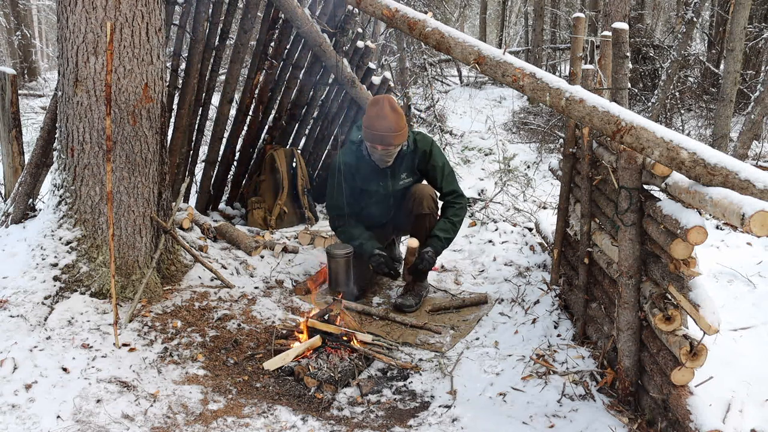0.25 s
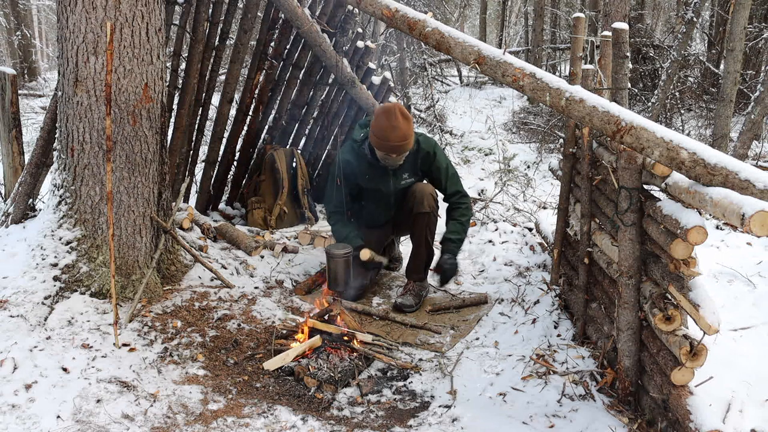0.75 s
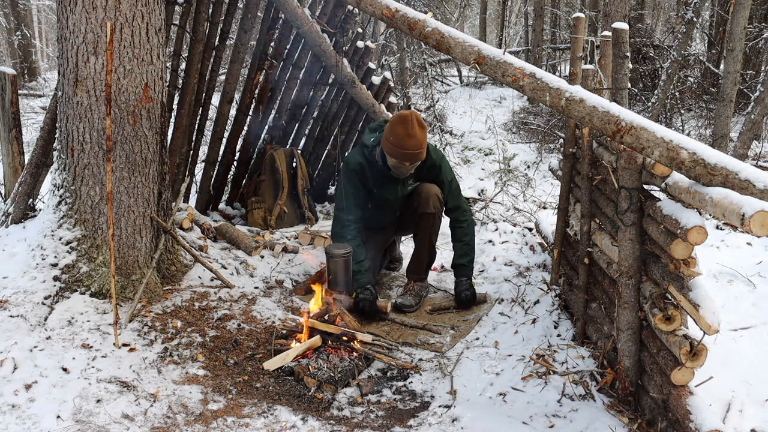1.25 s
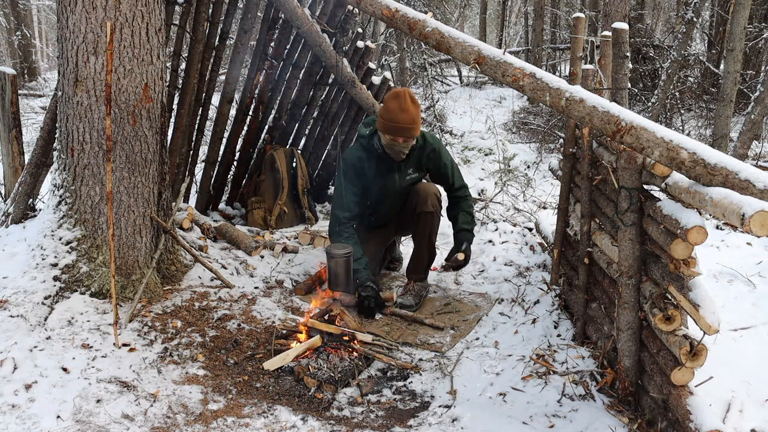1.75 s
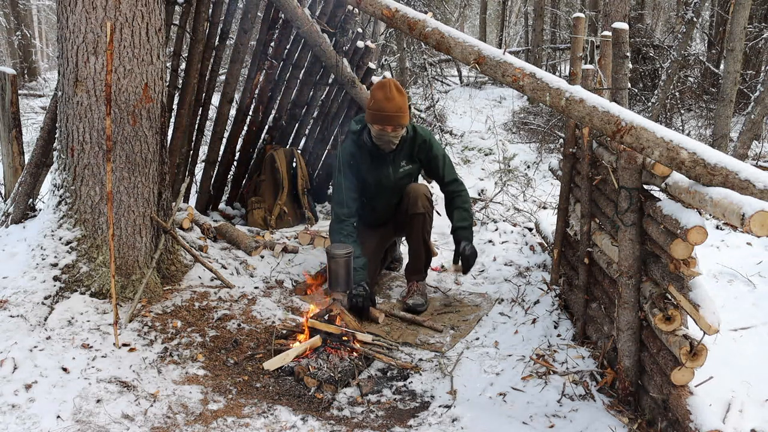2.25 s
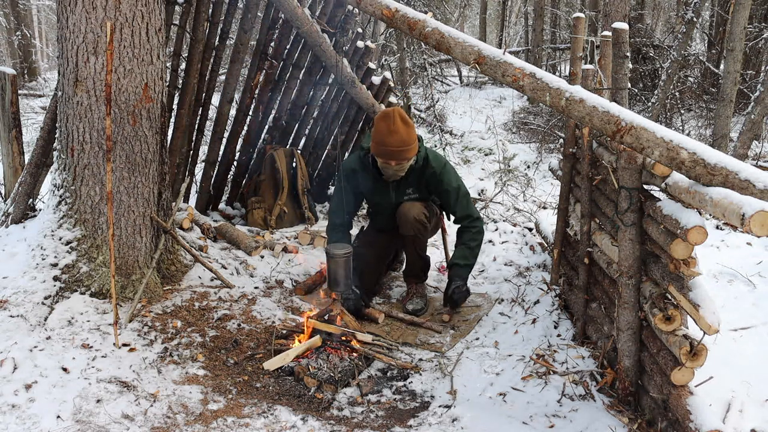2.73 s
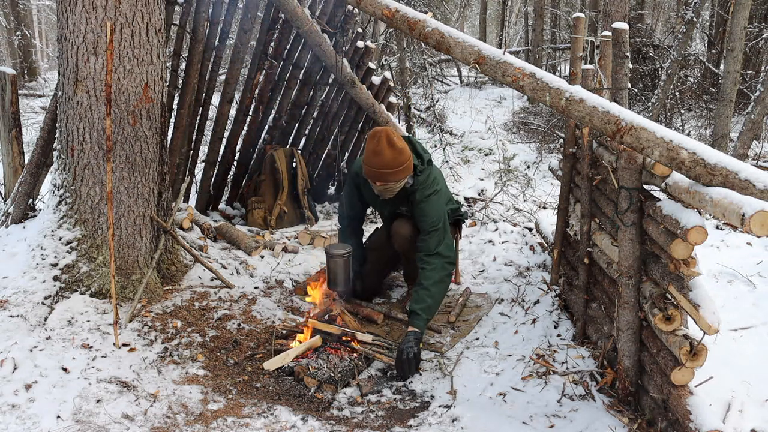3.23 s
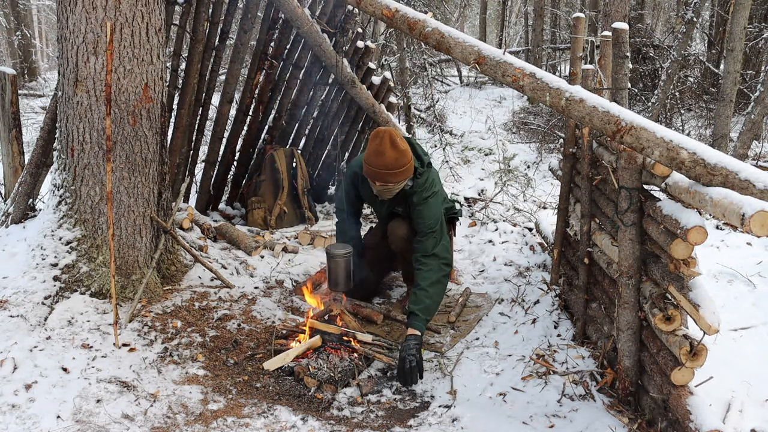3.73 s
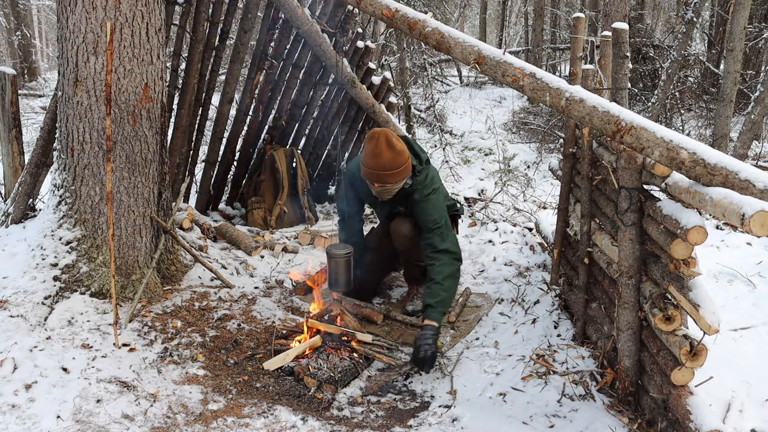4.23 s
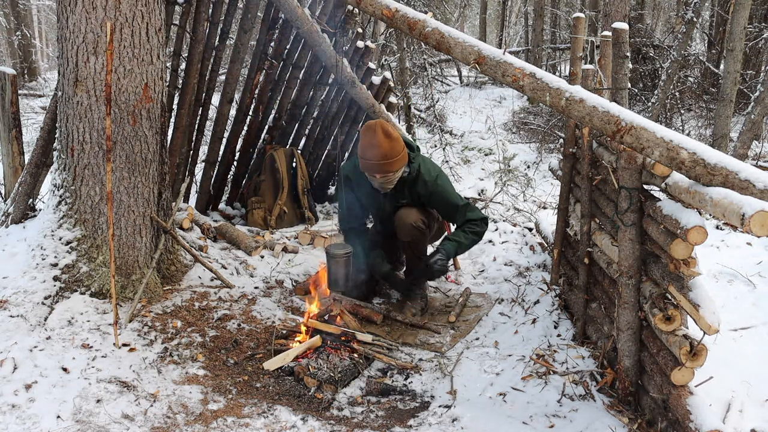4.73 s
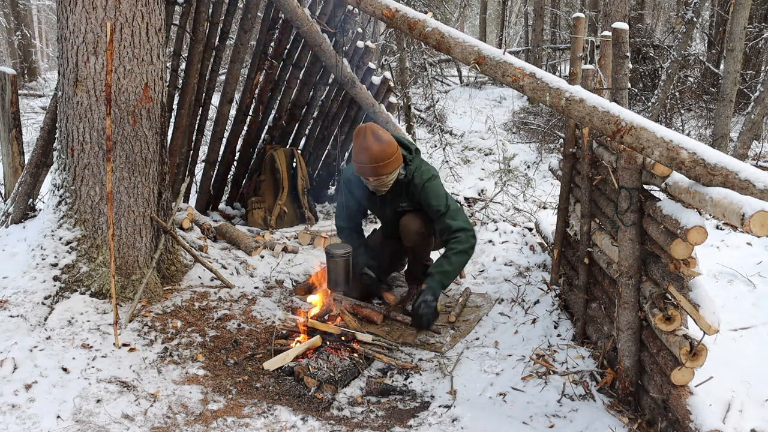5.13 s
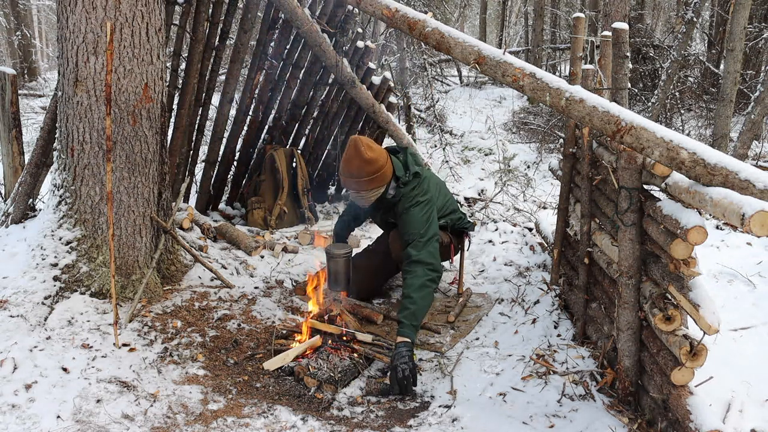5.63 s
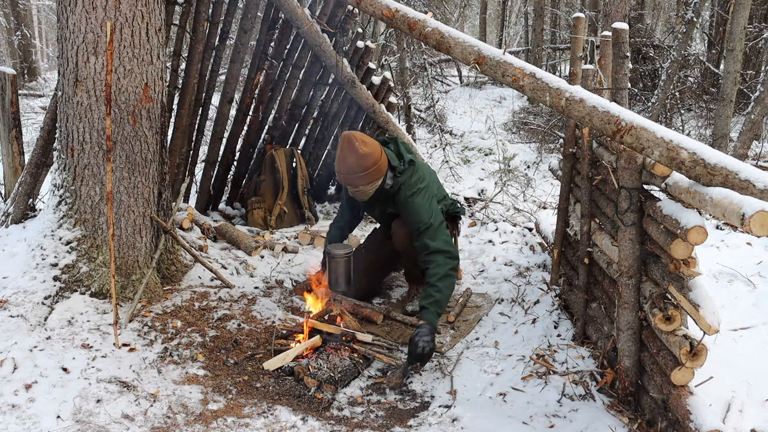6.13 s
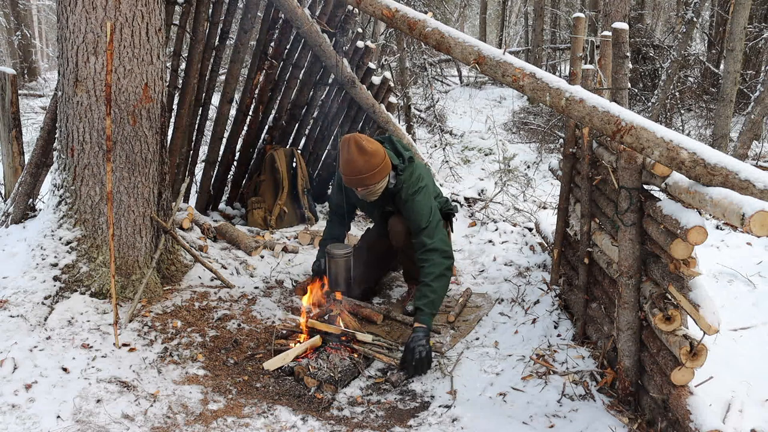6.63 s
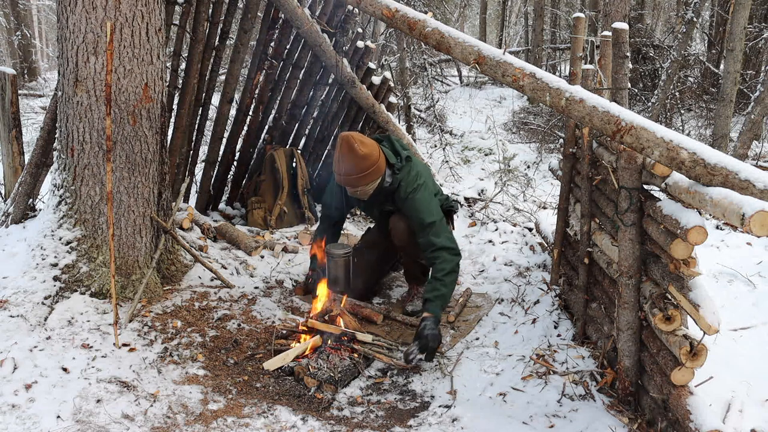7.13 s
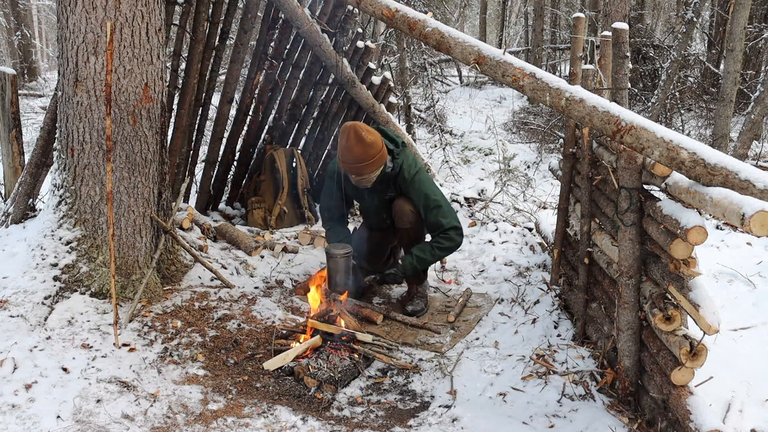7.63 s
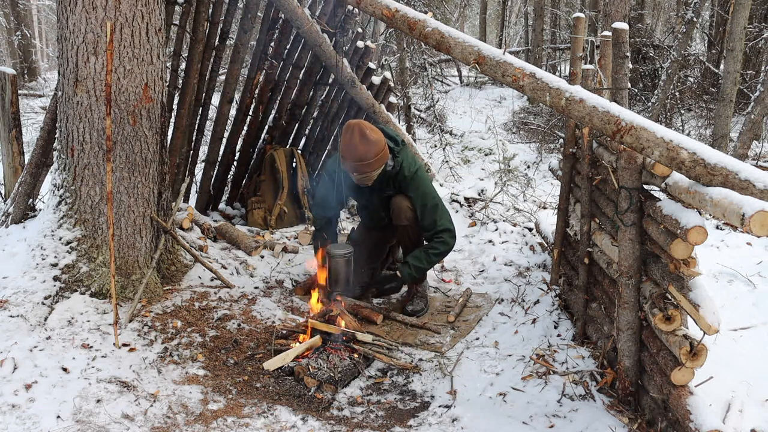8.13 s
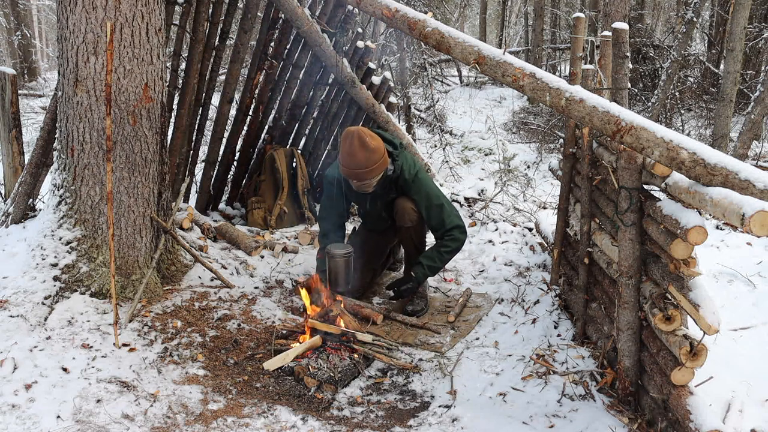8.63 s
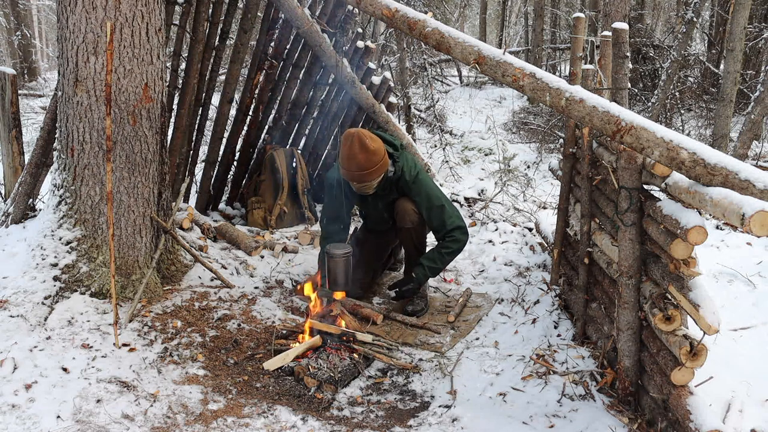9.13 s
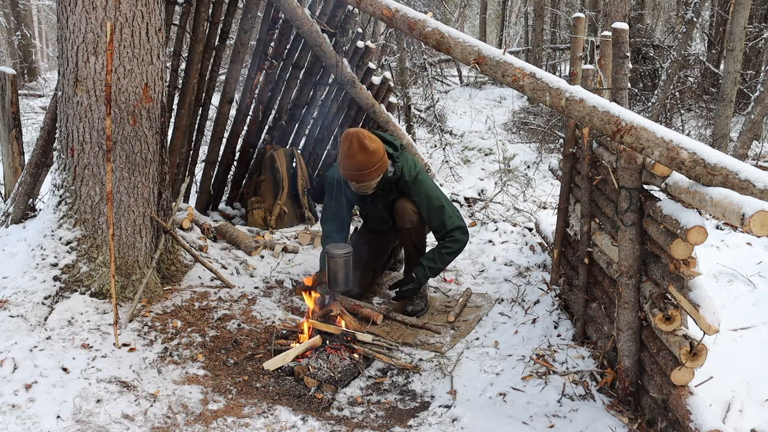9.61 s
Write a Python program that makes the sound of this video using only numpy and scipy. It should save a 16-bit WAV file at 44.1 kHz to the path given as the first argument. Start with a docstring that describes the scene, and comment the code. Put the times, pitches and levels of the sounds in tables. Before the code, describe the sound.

A small campfire is heard close up outdoors in a cold, quiet forest. A burst of rustle and hiss opens the scene, with a cluster of sharp pops at 0.1-0.5 s, two of them loud. Sticks knock softly between 1 and 3 s, with one bright clack near 1.6 s beside two loud snaps. Rustling of clothes and litter swells around 3 s, fades, then returns near 5, 6.4 and 7.2 s. Strong cracks stand out at 4.0, 4.2, 4.45, 4.7 and 6.35 s, then a dense run from 7 to 7.5 s ends in the loudest, clipped pair. More snaps follow at 8.0 and 8.5 s; afterwards the crackle thins, with one loud pop near 9.35 s. Throughout, tiny ticks, thin fizzing and faint low flame flutter continue, each pop leaving a short, scattered woody echo.

```python
"""Sharp pops are heard first: a small campfire crackles in a snowy forest as pockets of sap burst.
Each pop is a pressure impulse with splintering noise and decaying echoes from a log wall and trunks.
Behind them small pockets tick, and someone crouched beside the fire knocks sticks (decaying sines) and
rustles (filtered noise and short grains). Wet wood hisses and low flames flutter, both shaped noise.
The loudest pops overload and clip."""
import sys
import numpy as np
from scipy import signal
from scipy.fft import rfft, irfft, next_fast_len
from scipy.io import wavfile
from scipy.ndimage import uniform_filter1d, map_coordinates

SR = 44100
rng = np.random.default_rng(int(sys.argv[2]) if len(sys.argv) > 2 else 0)


def output_pcm(signal):
    """Save a mono or channel-first signal as 16-bit PCM at the path in sys.argv[1].

    Samples are clipped to [-1, 1] before scaling.
    """
    pcm = np.clip(np.atleast_2d(signal).T, -1, 1) * 32767
    wavfile.write(sys.argv[1], SR, np.round(pcm).astype(np.int16))


N = 435255


def amp(db):
    """Level in decibels to amplitude ratio."""
    return 10 ** (np.asarray(db) / 20)


def unit(x):
    """Normalization to a root-mean-square of 1."""
    return x / np.sqrt(np.mean(x ** 2) + 1e-20)


def along(points, hz):
    """Interpolation of (frequency, value) points on a logarithmic frequency axis."""
    point_hz, values = np.transpose(points)
    return np.interp(np.log(hz + 1), np.log(point_hz + 1), values)


def curves(rows):
    """Linear envelopes: one value per sample for each column after the time."""
    s, *columns = np.transpose(rows)
    return [np.interp(np.arange(N) / SR, s, column) for column in columns]


def wobble(rate):
    """Band-limited random modulation: a smooth curve through `rate` random knots a second."""
    knots = rng.standard_normal(N // 200 + 8)
    return map_coordinates(knots, [np.arange(N) * rate / SR])


def causal(x, spectrum):
    """Minimum-phase filtering by the folded cepstrum; the impulse response peaks at 1."""
    size = 2048
    level_db = along(spectrum, np.fft.rfftfreq(size, 1 / SR))
    cepstrum = irfft(np.log(amp(level_db)), size)
    cepstrum[1:size // 2] *= 2
    cepstrum[size // 2 + 1:] = 0
    response = irfft(np.exp(rfft(cepstrum)), size)[:size // 2]
    return signal.fftconvolve(x, response[None] / np.abs(response).max(), axes=1)[:, :N]


def place(times, rows):
    """Superposition of stereo rows (2, events, length) at their times in samples."""
    starts = np.round(times * SR).astype(int)
    where = (starts[:, None] + np.arange(rows.shape[-1])).ravel()
    return np.array([np.bincount(where, r.ravel(), N + SR)[:N] for r in rows])


# Likeness of the two channels of diffuse noise: (frequency [Hz], correlation [0..1])
CHANNEL_LIKENESS = [(50, 1), (1000, 0.86), (4000, 0.42), (12000, 0.043)]


def rush(spectrum, patchy_db):
    """Diffuse-field noise of rms 1: partly correlated channels, with time-frequency patches of gain."""
    hz, _, z = signal.stft(rng.standard_normal((2, N)), SR, nperseg=512)
    field = uniform_filter1d(rng.standard_normal(z.shape[1:]), size=8, axis=0)
    field = uniform_filter1d(field, size=6, axis=1)
    patches = amp(patchy_db * unit(field))
    # mid and side shares that give left and right the wanted correlation
    turn = np.arccos(np.clip(along(CHANNEL_LIKENESS, hz), -1, 1)) / 2
    shares = np.array([np.cos(turn), np.sin(turn)])[..., None]
    pair = signal.istft(z * patches * shares, nperseg=512)[1]
    m = next_fast_len(N)
    gain = amp(along(spectrum, np.fft.rfftfreq(m, 1 / SR)))
    mid, side = irfft(rfft(pair[:, :N], m) * gain, m)[:, :N]
    return unit(np.array([mid + side, mid - side]))


# Noise spectrum of the flames: (frequency [Hz], relative level [dB per Hz])
FLAME_SPECTRUM = [(15, -45), (25, -19.5), (109, 5.5), (201, -5.5), (301, -4), (509, -13), (900, -15.5),
                  (1170, -67), (1980, -120)]
FLUTTER_DB, FLUTTER_SWING_DB = -56, 3  # mean level, scale of its random swing


def flames():
    """Amplitude modulation of low-frequency noise: the flames flutter."""
    level_db = FLUTTER_DB + FLUTTER_SWING_DB * wobble(12)
    return amp(level_db) * rush(FLAME_SPECTRUM, patchy_db=.6)


# Slow levels of the background: (time [s], rustle level before trim [dB], hiss level [dB])
BED_LEVELS = [(0.0, -41, -41), (0.16, -52.5, -54), (0.79, -51, -60.5), (1.32, -47, -48), (2.61, -46, -51.5),
              (2.97, -39.5, -51.5), (3.68, -59, -63), (4.2, -54, -52.5), (4.9, -42.5, -53),
              (5.9, -52, -54.5), (6.4, -45.5, -50), (6.9, -55.5, -55), (7.25, -42.5, -47),
              (7.45, -51.5, -49.5), (7.59, -51.5, -56.5), (8.4, -56, -59.5), (9.23, -62.5, -61),
              (9.87, -58, -64)]
# Noise spectrum of the hiss: (frequency [Hz], relative level [dB per Hz])
HISS_SPECTRUM = [(1760, -59), (3000, 4.5), (5630, 3.5), (10700, 3.5), (12500, 5), (15100, -10),
                 (16200, -32)]
FIZZ_DB = 4  # scale of the quick unevenness


def wet_wood():
    """Rapid amplitude modulation of high-frequency noise: wet wood fizzes."""
    hiss_db = curves(BED_LEVELS)[1]
    return amp(hiss_db) * amp(FIZZ_DB * wobble(200)) * rush(HISS_SPECTRUM, patchy_db=1.5)


def crumbs(rustle_db):
    """Granular damped oscillation: dry litter and cloth give way in grains of a few cycles."""
    s, size, pitch, side = rng.random((2200, 4)).T[..., None]  # s: fraction of the scene
    t = np.arange(400) / SR
    hz = 550 * 6 ** pitch
    level_db = rustle_db[(s * N).astype(int)] + np.minimum(6 - 4 * np.log(size), 18)
    decay = amp(level_db - 60 * t * hz / 7)  # 60 dB in seven cycles
    grain = decay * np.sin(2 * np.pi * hz * t) * (1 - np.exp(-t * hz))
    pan = amp(3.8 * (side - 1.0) * np.array([1, -1])[:, None, None])  # leans right
    return place(s[:, 0] * N / SR, grain * pan)


# Noise spectrum of the rustle: (frequency [Hz], relative level [dB per Hz])
RUSTLE_SPECTRUM = [(150, -41), (250, 2), (400, 6), (782, -2.5), (1700, 6), (3490, -0.5), (5640, -13),
                   (7000, -20), (9100, -38), (15400, -120)]


def rustle():
    """Friction noise of clothes and litter: noise under irregular scratching, plus grains."""
    rustle_db = curves(BED_LEVELS)[0]
    scratch = unit(amp(5 * wobble(160) + 1.5 * wobble(30)))
    friction = amp(rustle_db - 2.5) * scratch * rush(RUSTLE_SPECTRUM, patchy_db=3.0)
    return friction + crumbs(rustle_db)


# Sticks knocking on wood and ground, and at 1.568 s a short high squeak: (time [s], level before mode gains
# [dB], lowest mode [Hz])
STICK_KNOCKS = [(1.037, -37.5, 686), (1.123, -35.5, 290), (1.313, -32, 328), (1.493, -37, 346),
                (1.522, -45, 330), (1.559, -41, 440), (1.568, -16, 1930), (2.063, -38, 563),
                (2.077, -39, 496), (2.289, -42, 303), (2.547, -30.5, 407), (2.556, -27.5, 324),
                (2.585, -37, 450), (2.728, -33.5, 562), (2.99, -32, 620), (4.613, -35.5, 667),
                (4.773, -36.5, 640), (7.124, -35, 313), (7.284, -29.5, 326), (8.503, -38, 268),
                (9.736, -42, 157)]


def sticks():
    """Modal vibration: three damped modes of a stick, and a noise thud stronger for low pitches."""
    s, db, hz = np.transpose(STICK_KNOCKS)[..., None]
    t = np.arange(SR // 8) / SR
    # frequency ratio, level [dB], cycles of the lowest mode to decay by 60 dB
    modes = [(1, 10, 12.8), (1.45, 2, 15), (2.2, 0, 16)]
    tones = sum(amp(level - 60 * t * hz / cycles) * np.sin(2 * np.pi * ratio * hz * t)
                for ratio, level, cycles in modes)
    noise = rng.standard_normal((len(s), 3, len(t))).transpose(1, 0, 2)
    band = signal.butter(2, [150, 800], "bandpass", fs=SR, output="sos")
    thud = unit(signal.sosfilt(band, noise[0] + .4 * noise[1:])) * amp(-60 * t / .03)
    onset = 1 - np.exp(-t / .0012)
    return place(s[:, 0], amp(db) * onset * (tones + 120 / hz * thud))


# Small pockets [dB]: level over the hiss, spread of sizes, largest, mean body, mean tail before trim
TICK_DB, TICK_SPREAD_DB, TICK_TOP_DB, TICK_BODY_DB, TICK_TAIL_DB = 18.5, 4.5, 30.5, -8.5, -27


def ticks():
    """Random impulse process: 420 small pockets tick, strongest while the wood hisses."""
    when, size, tone, spread = rng.random((420, 4)).T
    hiss_db = curves(BED_LEVELS)[1][(when * N).astype(int)]
    db = hiss_db + np.minimum(TICK_DB - TICK_SPREAD_DB * np.log(size), TICK_TOP_DB)
    body_db = TICK_BODY_DB + 22 * (tone - .5)
    tail_db = TICK_TAIL_DB + 12 * (spread - .5)
    return pops(when * N / SR, db, body_db, tail_db, length=1024)


def bursts(tail_db, splinter, near_t60, far_t60, far_db, alike, spiky_db, wall_db, length):
    """Impulse and scattering: a spike, brief splintering, then echoes from near logs and far trunks."""
    t = np.arange(length) / SR
    noise = rng.standard_normal((len(tail_db), 3, length)).transpose(1, 0, 2)
    share = np.clip(alike, 0, 1)
    pair = np.sqrt(share) * noise[0] + np.sqrt(1 - share) * noise[1:]
    spike = (t == 0) + splinter * pair * amp(-60 * t / .0014) * (t > 0)
    # single logs stand out of the scatter as separate slaps, different in each channel
    steps = rng.standard_normal((len(tail_db), 2, length // 16))
    slaps = amp(spiky_db * np.repeat(steps, 16, axis=2).transpose(1, 0, 2))
    # the log wall answers about a metre of path later, mostly on the left
    wall = amp(wall_db) * np.exp(-((t - .0033) / 0.00029) ** 2) * np.array([1, .4])[:, None, None]
    near = (amp(-60 * t / near_t60) + wall) * slaps
    far = amp(far_db - 60 * t / far_t60)
    rise = 1 - np.exp(-t / 0.00025)
    return spike + amp(tail_db)[:, None] * pair * (near + far) * rise


# Filter of the bright crack: (frequency [Hz], relative level [dB])
CRACK_SPECTRUM = [(300, -35.5), (2000, -3), (5000, -0.5), (8000, 2), (11500, 4), (14000, -6.5),
                  (17000, -11.5)]
# Filter of the lower body: (frequency [Hz], relative level [dB])
BODY_SPECTRUM = [(25, -29.5), (70, -8.5), (800, -10), (1600, -0.5), (3000, -0.5), (8000, -10), (16000, -36)]
# Pops that stand out: (time [s], treble level before panning [dB], body relative to treble [dB],
# scattered tail before trim [dB])
SAP_POPS = [(0.0864, -19, -14, -29.5), (0.091, -17, -21, -33), (0.1008, -27, -18, -40),
            (0.1198, -15.5, -4, -40), (0.1404, -7.5, -3, -26), (0.164, -18, -4.5, -24),
            (0.1749, -18, -16, -32), (0.1876, -6, -15, -23), (0.2071, -18, -4, -19), (0.2316, 5.5, -9, -25),
            (0.293, -14.5, -7.5, -19), (0.3162, 5.5, -7.5, -27.5), (0.3546, -18, -3.5, -14),
            (0.4932, -6, -12, -17), (0.733, -4, -39, -34), (0.776, -15, -15, -26), (0.7892, -19, -12, -24),
            (0.8049, -23, 2, -20), (0.8329, -25.5, -2, -15), (0.8457, -26, 0, -13), (1.0584, -1, -2, -24),
            (1.0865, -14, -22, -24), (1.127, -12, -12, -20), (1.1672, -13.5, -9, -17.5),
            (1.2095, -3.5, -14, -31), (1.238, -13.5, -4, -18.5), (1.255, -13.5, -1, -32),
            (1.3458, -14, -6, -17), (1.4127, 2.5, -9.5, -28), (1.4797, -18, -1, -18),
            (1.5029, -19, -9, -13), (1.5259, -18, -3, -35), (1.5734, 7.5, -7.5, -25), (1.597, 7, -13, -27),
            (1.6697, -10.5, -16.5, -27), (1.702, -12, -9, -18.5), (1.7172, -14, -27, -28),
            (1.7808, -15.5, -28, -38), (1.809, -21, -18, -25), (1.821, -12, -9.5, -18),
            (1.9307, -12, -8.5, -14), (2.0996, -21, -14, -32), (2.1975, -13, -10, -25),
            (2.2802, -14, -5.5, -15.5), (2.407, -7, -6, -26), (2.558, -17, -5, -14.5),
            (2.5735, -13, -11, -23), (2.6774, -18, -17, -10.5), (2.6889, -23.5, 3, -17.5),
            (2.7101, -26.5, 5.5, -27), (2.8201, -13.5, -8, -25), (2.8299, -18.5, 2, -22),
            (2.8446, -7.5, -19, -35), (2.877, -9.5, -2.5, -20.5), (2.93, -25.5, 3, -26),
            (2.9758, -22, 4.5, -25), (3.058, -12.5, -3, -25), (3.0881, -12, -12, -26),
            (3.093, -11.5, -11, -30), (3.1027, -18, -5, -19), (3.118, -21, -3, -9), (3.1251, -9.5, -8, -19),
            (3.129, -7, -7, -25), (3.2387, -4, -13, -24.5), (3.3034, -17.5, -12, -28),
            (3.3337, -23.5, -9, -20), (3.4045, -29.5, 2.5, -18), (3.4782, -33.5, 3, -18),
            (3.4879, -18, -9, -26), (3.5296, 2, -15, -24), (3.5498, -16, -13, -22), (3.5847, -16, 1.5, -22),
            (3.5928, -11, -11, -25), (3.6022, -9, -13, -19), (3.6164, -13, -1.5, -18),
            (3.6682, -24, -14, -19.5), (3.7931, -18.5, -12, -23), (3.7995, -19, -19, -24),
            (3.8326, -19.5, -15, -22), (3.8498, -14.5, -2.5, -16), (3.9427, -11, -3, -27),
            (3.9564, -22, -9, -21), (3.987, -17.5, -9, -13), (3.9956, 8, -14.5, -28.5),
            (4.0157, -19, -9, -13), (4.0214, -19, -6, -23), (4.0951, -16.5, -3, -23),
            (4.1433, -29.5, 1.5, -19), (4.1686, -29, 2, -20), (4.2184, 4.5, -10.5, -20),
            (4.243, -18, -9, -14), (4.3267, -16, -17, -22), (4.3653, -4.5, -15.5, -28),
            (4.4316, -8, -17, -29), (4.439, -1, -7.5, -31), (4.4496, 6, -27, -29.5),
            (4.551, -18.5, -6, -27), (4.622, -20.5, -2.5, -20), (4.7333, 3, -6.5, -31),
            (4.7753, -16, -14, -10.5), (4.7846, -14.5, -2.5, -15), (4.8617, -17, -0.5, -18),
            (4.8754, -15, -9, -18), (4.9032, -8.5, -16, -32), (4.9075, -8, 1.5, -25),
            (4.9759, -10.5, -27, -30), (5.038, -20, -13, -24), (5.0422, -22, -13, -26),
            (5.0574, -22, 7.5, -23), (5.1514, -1, -10.5, -25.5), (5.1928, -4.5, -10, -29),
            (5.2238, 0, -8.5, -19), (5.2948, -17.5, -10, -22), (5.3395, -9, -10, -17.5),
            (5.387, -11.5, -21, -27), (5.4875, -12.5, -4.5, -11.5), (5.5417, -13.5, -7, -9.5),
            (5.547, -15.5, 3.5, -18), (5.589, -7, -11, -30), (5.6084, -15, -3, -16.5),
            (5.6864, -11, -1, -26), (5.7177, -14, 0, -19), (5.7381, -14.5, -12, -17),
            (5.7879, -17.5, 0.5, -26), (5.8956, -14, -7, -23), (5.9755, -20, -6, -16),
            (5.9901, -17.5, -9, -26), (6.0077, -8, -12, -25), (6.0229, -6, -32, -23),
            (6.0577, -9.5, -12, -25), (6.1038, -10, -27, -31), (6.1434, -19.5, -26, -25),
            (6.1788, -14, -7.5, -17), (6.2114, -19, -14, -26), (6.2255, -22, -13, -19),
            (6.2357, -10.5, -11, -22), (6.2422, -11.5, -10, -28), (6.354, 6, -6, -28),
            (6.392, -7, -26, -25), (6.419, -20, -1.5, -26), (6.4506, -16.5, -16, -29), (6.48, -16, -2, -19),
            (6.5102, -4, -17.5, -24), (6.5327, -21, -9, -19), (6.5429, -12.5, -12, -25),
            (6.5842, -12.5, -14, -29), (6.6235, -21, -21, -28), (6.6805, -3, -26, -23.5),
            (6.714, 2.5, -8, -33), (6.7887, -12.5, -9, -17), (6.8414, -14, -1, -19),
            (6.8523, -2.5, -7, -24), (7.0115, 3, -16, -17.5), (7.04, -14, -6, -21),
            (7.0544, 4.5, -9.5, -18.5), (7.1276, -1, 3.5, -22), (7.2266, -11, -4, -16),
            (7.2403, -20, -3, -21), (7.2568, -21, 2, -17), (7.2722, -16, -19, -25), (7.2868, 3.5, 2.5, -30),
            (7.3026, -18, 2, -22), (7.3528, -11, -13, -33), (7.4082, 8.5, -10.5, -28.5),
            (7.4752, 10.5, -15.5, -31.5), (7.5198, -12, -12, -17), (7.644, -13.5, -3.5, -20),
            (7.7546, -12.5, -15, -28), (7.7988, -16, -7.5, -13.5), (7.8442, -2.5, -11, -28),
            (7.8656, -3.5, -10, -24), (7.8905, -9, -4, -30), (7.9186, -17.5, -23, -28),
            (8.0071, -17, -3, -31), (8.0168, 7.5, -13.5, -24), (8.058, -20, -12, -27),
            (8.13, -26, 0.5, -29), (8.1937, -19, -3, -34), (8.2483, -24, -10, -17), (8.2559, -22, -3, -16),
            (8.2603, -7.5, -17, -29), (8.3046, -10.5, -16, -25.5), (8.3147, -14, -3.5, -19),
            (8.328, -12.5, -5, -18), (8.3336, -1.5, -19, -26), (8.348, -14.5, -6, -18),
            (8.3903, -16, -28, -22), (8.5026, -13, -10, -5), (8.5077, 3.5, -3.5, -22),
            (8.5409, -19, -2, -7), (8.5623, -13.5, 0.5, -14.5), (8.6753, -33, 8, -13.5),
            (8.6842, -19.5, -14, -25), (8.7177, -24, 3, -24), (8.733, -24, -9, -25), (8.7457, -22, 2, -27),
            (8.81, -23, -4, -22), (8.815, -12, -17, -26), (8.8532, -26, -10, -26), (8.8775, -21.5, 1, -26),
            (8.8972, -27, 0, -24), (8.9378, -15, -9.5, -25), (8.9529, -27, -11, -29),
            (9.0564, -23.5, -20, -27), (9.0674, -23, -1, -27), (9.0899, -3.5, -27, -43),
            (9.1006, -21, 1, -16), (9.1095, -24, 3.5, -26), (9.1315, -14.5, 2.5, -22),
            (9.26, -32, -10, -30), (9.2974, -40, 7.5, -20), (9.3484, 2, -6, -30), (9.3829, -27, -4, -17),
            (9.4023, -10, -26, -32), (9.446, -15, -0.5, -20.5), (9.4673, -30, 6, -20),
            (9.485, -15.5, -21, -45), (9.523, -12, -28, -30), (9.5787, -23.5, -27, -23),
            (9.6214, -27, -15, -30), (9.6421, -22.5, -3, -19), (9.6599, -20.5, -2, -18),
            (9.7391, -8.5, -2, -11), (9.7875, -7.5, -12, -25), (9.7969, -14.5, -13, -41),
            (9.8334, -11, -3.5, -23), (9.8476, -16, -34, -28)]


def pops(s, db, body_db, tail_db, length):
    """Impulsive release of pressure: a bright crack and a lower body, each pop panned slightly apart."""
    pan = amp(.6 * rng.standard_normal(len(s)) * [[1], [-1]])[..., None]
    crack = bursts(tail_db - 7.5, splinter=0.35, near_t60=0.04, far_t60=0.23, far_db=-14.5,
                   alike=0.39, spiky_db=5.87, wall_db=0.82, length=length)
    body = bursts(tail_db - 7.0, splinter=0.77, near_t60=0.043, far_t60=0.24, far_db=-16.0,
                  alike=0.95, spiky_db=1.46, wall_db=-6, length=length)
    # the crack leans left, the body right
    crack = place(s, crack * pan * amp(db)[:, None]) * amp([[.6], [-.6]])
    body = place(s, body * pan * amp(db + body_db)[:, None]) * amp([[-1.6], [1.6]])
    return causal(crack, CRACK_SPECTRUM) + causal(body, BODY_SPECTRUM)


def scene():
    """Linear superposition of the background, the sticks, the ticks and the main pops."""
    background = flames() + wet_wood() + rustle()
    return background + sticks() + ticks() + pops(*np.transpose(SAP_POPS), length=3584)


TOP_HZ = 16550  # band limit


def record(dry):
    """Saturation and band limiting: peaks clip, then nothing is kept above the band limit."""
    clipped = np.clip(dry, -1, 1)
    m = next_fast_len(N + SR // 10)
    edge = np.clip((TOP_HZ - np.fft.rfftfreq(m, 1 / SR)) / 400, 0, 1)  # 400 Hz wide
    return irfft(rfft(clipped, m) * np.sin(np.pi / 2 * edge) ** 2, m)[:, :N]


dry = scene()
out = record(dry)
output_pcm(out)
```